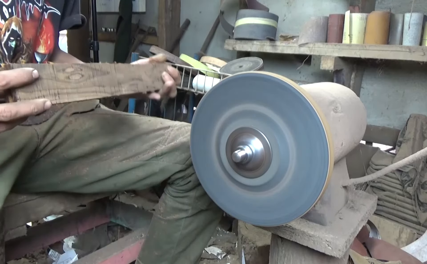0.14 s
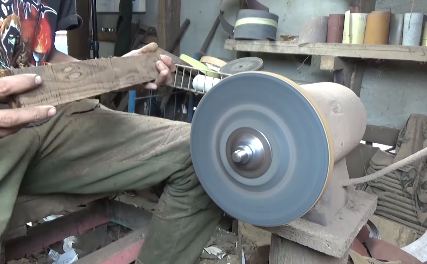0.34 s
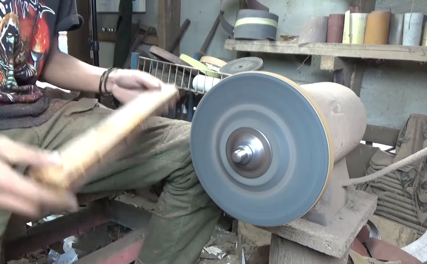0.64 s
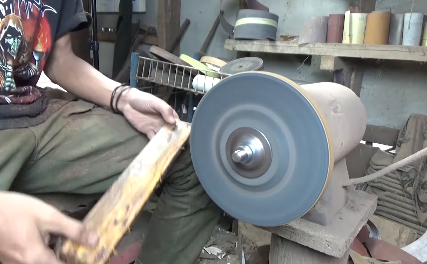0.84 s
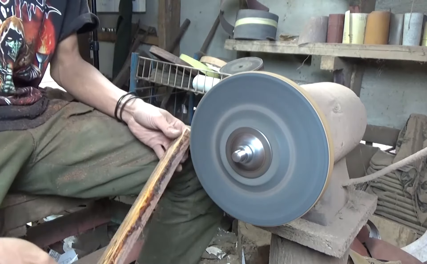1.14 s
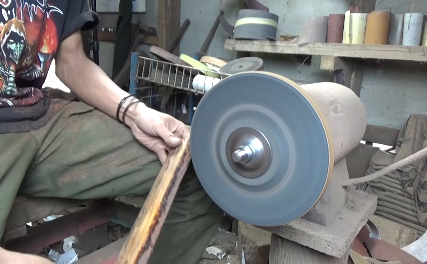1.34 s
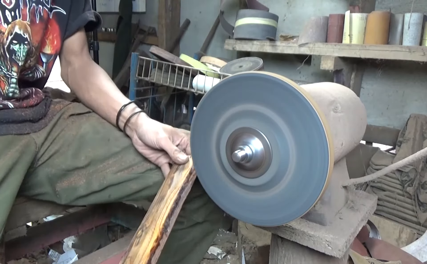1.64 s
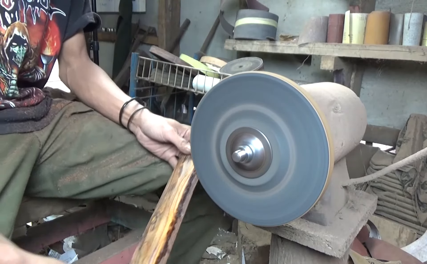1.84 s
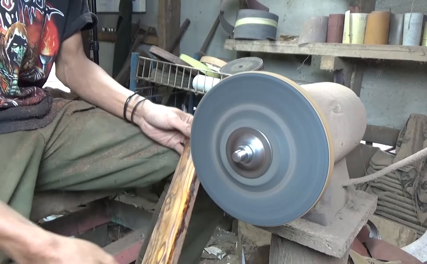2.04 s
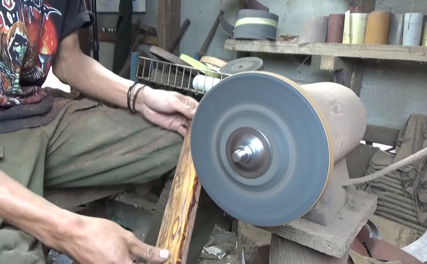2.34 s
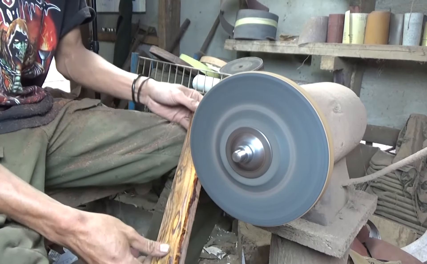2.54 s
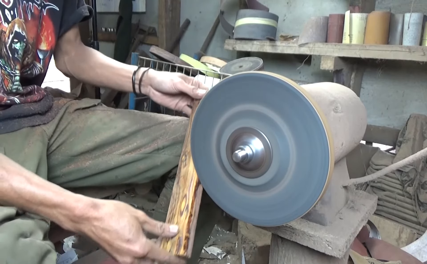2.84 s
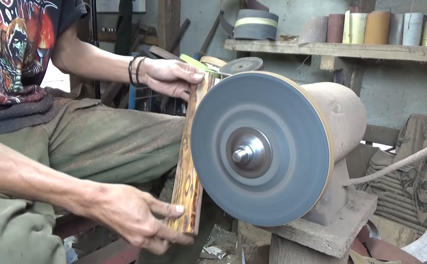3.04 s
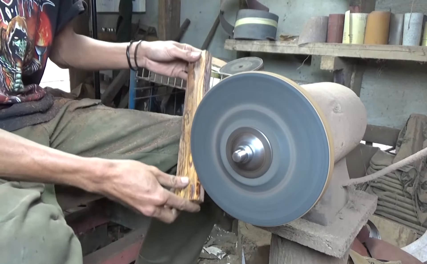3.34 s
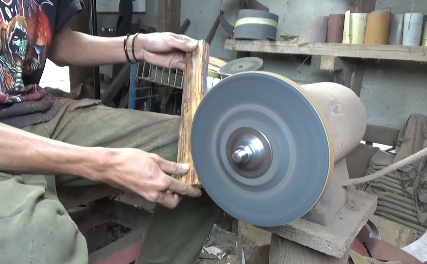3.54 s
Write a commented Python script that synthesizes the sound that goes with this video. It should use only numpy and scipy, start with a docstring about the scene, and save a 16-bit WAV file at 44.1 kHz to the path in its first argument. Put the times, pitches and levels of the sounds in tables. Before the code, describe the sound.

Close in a small workshop, a spinning sander hums and whines alone, then grinds wood in a loud hissing rasp; a short chattering gap separates the first pass from a longer second one.

```python
"""In a workshop an electric disc sander idles, then a board is pressed on its rim in two passes.
The idling machine is a revolving noise with wavering tones; a low drone joins it from the first contact.
The disc wobbles, so light contact comes in one burst per turn; part of the grit pattern returns each turn,
giving a buzzy rasp coloured by the rings of the board. Between the passes the board lifts off and
bounces back against the disc. Sparse echoes of the rasp make the room."""
import sys
import numpy as np
from scipy import signal
from scipy.fft import rfft, irfft
from scipy.io import wavfile
from scipy.ndimage import uniform_filter1d, map_coordinates

SR = 44100
rng = np.random.default_rng(int(sys.argv[2]) if len(sys.argv) > 2 else 0)


def dump(signal):
    """Clip the signal to [-1, 1] and save it as 16-bit WAV at the path in sys.argv[1]."""
    limited = np.clip(np.atleast_2d(signal).T, -1, 1)
    pcm = np.round(limited * 32767).astype(np.int16)
    wavfile.write(sys.argv[1], SR, pcm)


N = 163170
T = np.arange(N) / SR
IDLE_HZ, LOADED_HZ = 49.95, 49.3  # repeats per second of the idling whirr, turns per second under the board

# The two passes of the board. Each row: start in seconds, end in seconds.
PASS_SPANS = [(1.308, 2.15), (2.398, 3.8)]


def amp(db):
    """Level law: a ratio of amplitudes is 10 to the power of dB / 20."""
    return 10 ** (np.asarray(db) / 20)


def evened(x):
    """Normalisation: scale a signal to rms 1."""
    return x / np.sqrt(np.mean(x ** 2) + 1e-20)


def read(points, hz):
    """Interpolation of a spectrum along a logarithmic frequency axis."""
    f, value = np.transpose(points)
    return np.interp(np.log(hz + 1), np.log(f + 1), value)


def curve(rows, column=1):
    """Linear interpolation in time of one column of a table."""
    rows = np.array(rows)
    return np.interp(T, rows[:, 0], rows[:, column])


def wander(rate_hz):
    """Low-passed noise: a random fluctuation of rms 1, mostly slower than the given rate."""
    hz = np.fft.rfftfreq(N, 1 / SR)
    low_pass = (hz > 0) / (1 + (hz / rate_hz) ** 4)
    return evened(irfft(rfft(rng.standard_normal(N)) * low_pass, N))


def colour(x, gain_db):
    """Minimum-phase filtering: the Hilbert transform of the log gain gives the phase of a causal filter."""
    hz = abs(np.fft.fftfreq(16384, 1 / SR))
    log_gain = np.log(amp(np.maximum(gain_db(hz), -110)))
    taps = np.fft.ifft(np.exp(np.conj(signal.hilbert(log_gain)))).real[:4096]
    return signal.oaconvolve(x, taps / np.linalg.norm(taps))[:N]


def revolving(turns, turn_hz, same, drift):
    """Cyclic noise around a disc: part returns every turn, its phase drifting (rad per turn); the rest is new."""
    size, count = 2048, int(turns[-1]) + 2  # points per turn, number of turns
    hz = np.arange(size // 2 + 1) * turn_hz
    share = np.clip(read(same, hz), 0, 1)
    new_real, new_imag, steps = rng.standard_normal((3, count, len(hz)))
    start_phase = 2 * np.pi * rng.random(len(hz))
    kept = np.exp(1j * (np.cumsum(drift * steps, axis=0) + start_phase))
    fresh = new_real + 1j * new_imag
    spectrum = np.sqrt(share) * kept + np.sqrt((1 - share) / 2) * fresh
    spectrum = spectrum * (hz < SR / 2.1)  # stay below the Nyquist limit
    around = irfft(spectrum, axis=1).ravel()
    return evened(map_coordinates(around, [turns * size], order=3))


def workshop(x):
    """Reverberation: sparse echoes of random sign, each band decaying at its own rate."""
    # Each row: frequency in Hz, time to fall by 60 dB in seconds.
    room_t60 = [(200, 0.17), (12000, 0.089)]
    taps = np.zeros(SR // 2)
    at = np.arange(200, len(taps) - 20, 20)
    taps[at + rng.integers(0, 20, len(at))] = rng.choice([-1., 1.], len(at))
    hz, t, z = signal.stft(taps, SR, nperseg=256)
    decay = amp(-60 * t / read(room_t60, hz)[:, None])
    tail = signal.istft(z * decay, SR, nperseg=256)[1]
    return signal.fftconvolve(x, tail / np.linalg.norm(tail))[:N]


def idling():
    """Rotating-machine noise: a partly periodic whirr plus tones with wavering level and phase."""
    # Spectrum of the whirr. Each row: frequency in Hz, relative level in dB per Hz.
    whirr_colour = [(80, -43), (130, -15.5), (250, -11.5), (450, -5.5), (640, -21), (930, -10.5),
                    (1280, -8.5), (1740, -16), (2410, -4), (2800, -15), (3600, -7), (4900, -14),
                    (5400, -25), (8200, -25.5), (9600, -18.5), (12500, -28.5), (14500, -52)]
    # Periodicity of the whirr. Each row: frequency in Hz, share of the power returning each cycle.
    whirr_same = [(300, 0.62), (2500, 0.47), (7000, 0.16)]
    # Each row: time in seconds, rms level of the whirr in dB, swell of the whine in dB.
    whirr_level = [(0, -31, -6), (.45, -30.5, 5), (1.25, -29, 4.5)]
    # Mains hum, motor tones and whine. Each row: frequency in Hz, rms level in dB before swell and waver.
    tones = [(99.9, -50.5), (295.2, -41.5), (442.8, -48), (449.7, -43), (1276, -44), (2257, -44),
             (2401, -43), (2503, -47.5)]

    whirr = revolving(IDLE_HZ * T, IDLE_HZ, whirr_same, 0.25)
    whirr = evened(colour(whirr, lambda hz: read(whirr_colour, hz)))
    out = amp(curve(whirr_level)) * whirr
    for hz, db in tones:
        swell = curve(whirr_level, column=2) if 2100 < hz < 2700 else 0  # only the whine swells
        loose = .15 if hz < 150 else 1  # the mains hum is nearly steady
        waver = loose * 3 * wander(11.5)  # dB
        slip = loose * 0.089 * wander(13.0)  # cycles
        out = out + np.sqrt(2) * amp(db + swell + waver) * np.sin(2 * np.pi * (hz * T + rng.random() + slip))
    return out


def drone():
    """Forced vibration: the bench hums at the fifth harmonic of the turn rate, its phase wavering a little."""
    # Each row: time in seconds, rms level in dB.
    drone_level = [(1.48, -41), (1.93, -56), (2.0, -34), (2.2, -46), (2.42, -50), (2.5, -27), (2.62, -36),
                   (3.36, -40.5), (3.48, -32.5), (3.7, -34)]
    cycles = 5 * LOADED_HZ * T  # the waver below is in radians / 2 pi, that is cycles
    level = amp(curve(drone_level)) * (T > PASS_SPANS[0][0])
    return np.sqrt(2) * level * np.sin(2 * np.pi * (cycles + .05 * wander(8.)))


def bounces():
    """Impact envelopes: linear rise and exponential decay of each bounce, for bass, ring, middle and hiss."""
    # Each row: start in seconds, hiss level in dB before rise and decay, middle above the hiss in dB,
    # decay time in seconds.
    bounce_rows = [(2.2275, -4, -5.5, 0.0057), (2.238, -18.5, 1.5, 0.0068), (2.261, 0.5, -6.5, 0.0031),
                   (2.29, -19, 5, 0.0045), (2.302, -6, -1, 0.0029), (2.343, -3.5, -0.5, 0.0027),
                   (2.369, -19, 4, 0.0078), (2.383, -6.5, 3, 0.0054)]
    rise_s, ring_db, bass_db = 0.0027, -3.5, -17.5  # ring over the middle, bass over the hiss
    out = np.zeros((4, N))
    for start, db, middle_db, length in bounce_rows:
        since = np.maximum(T - start, 0)
        shape = np.minimum(since / rise_s, 1) * np.exp(-since / max(length, .001))
        band_db = np.array([[bass_db], [middle_db + ring_db], [middle_db], [0]])
        out += amp(db + band_db) * shape
    return out


def patchy(x, depth_db):
    """Time-frequency modulation: the colour drifts in patches about 600 Hz wide and .1 s long."""
    z = signal.stft(x, nperseg=256, noverlap=128)[2]
    field = rng.standard_normal(z.shape)
    for _ in range(2):
        field = uniform_filter1d(field, size=3, axis=0)
        field = uniform_filter1d(field, size=24, axis=1)
    modulated = z * amp(depth_db * evened(field))
    return evened(signal.istft(modulated, nperseg=256, noverlap=128)[1][:N])


def knocks(turns):
    """Periodic impact: the high spot of the disc strikes once a turn, a little harder or softer each time."""
    struck = np.diff(np.floor(turns), prepend=np.floor(turns[0])) > 0
    return evened(struck * amp(3.5 * wander(20)))  # unevenness of 3.5 dB


def board(hz, band, grip):
    """Modal resonance: the rasp's colour (dB) raised by the board's rings, in one band and one grip."""
    # Spectrum of the rasp. Each row: frequency in Hz, relative level in dB per Hz.
    rasp_colour = [(59, -66.5), (100, -27), (230, -14.5), (634, -16.5), (1000, -8.5), (1340, -15.5),
                   (2130, -6.5), (4980, -10.5), (9610, 0), (12900, -2.5), (16000, -25)]
    # Edges of bass, ring, middle and hiss, in Hz.
    band_edges = (0, 650, 1500, 5000, SR)
    # Rings common to all grips. Each row: frequency in Hz, width in Hz, height over the rasp in dB.
    low_rings = [(258, 15, 15), (418, 25, 10)]
    # Rings that trade strength. Each row: frequency in Hz, width in Hz, then height in dB in each of four grips.
    board_rings = [(817, 110, -3, -11, 6, 8.5), (1117, 156, 8, 15, 10, 12), (1600, 35, -12, -2, 9, 8.5),
                   (1754, 24, -7, 10.5, 9, 12.5), (2086, 128, 0.5, 8, 8, 1), (2804, 110, 4, 8, -10, 3),
                   (3678, 96, -3, -3, 3.5, 7.5), (5720, 190, 14, -1, -15, 2), (7400, 670, 5.5, 7.5, 4, -4),
                   (9370, 900, -8, -7, 3.5, 1)]

    modes = low_rings + [(row[0], row[1], row[2 + grip]) for row in board_rings]
    rings = sum(amp(db) ** 2 / (1 + (2 * (hz - f) / width) ** 2) for f, width, db in modes)
    lo, hi = band_edges[band:band + 2]
    edges = (1 + (lo / (hz + 1)) ** 12) * (1 + (hz / hi) ** 12)
    return read(rasp_colour, hz) + 10 * np.log10((1 + rings) / edges)


def contact(turns, pressure):
    """Intermittent contact: pressure plus the disc's wobble, cut off below zero and smoothed in time."""
    let_go_s = 0.0015
    keep = np.exp(-1 / (let_go_s * SR))
    wobble = np.cos(2 * np.pi * (turns + 0.037))
    force = np.maximum(np.maximum(pressure, -.95) + wobble, 0)
    touch = signal.lfilter([1 - keep], [1, -keep], force)
    power = uniform_filter1d(touch ** 2, size=round(2 * SR / LOADED_HZ))  # over two turns
    return touch / np.sqrt(power + 1e-9)


def sanding():
    """Source and filter: grit noise, gated by contact and by bounces, drives the resonant board in four bands."""
    # One table for each pass. Each row: time in seconds, level of the hiss in dB, then above the hiss
    # in dB: middle, board ring, bass.
    passes = [
        [(1.31, -16, -8.5, -17, -29), (1.42, -19.5, 2, -17, -28), (1.47, -15.5, -2, -11.5, -27),
         (1.6, -12.5, -12.5, -13.5, -27.5), (1.8, -16.5, -3.5, -7, -17), (1.94, -15, -7, -2.5, -25),
         (2.0, -20, -3.5, -5.5, -6), (2.07, -14, -11, -9.5, -16.5), (2.15, -18.5, -5, -6, -20.5)],
        [(2.4, -20.5, -1, -5, -13), (2.5, -17, -1.5, -3, -3.5), (2.58, -16, -1.5, -5, -13),
         (3.5, -16.5, -1, -10.5, -14), (3.69, -19.5, 2.5, -9, -14)],
    ]
    # Hold on the board. Each row: time in seconds, place around the rim in turns, pressure in heights
    # of the wobble (under 1 contact breaks once a turn).
    hold = [(1.3, 0.18, -0.8), (1.42, 0.23, -0.16), (1.53, .41, 1), (1.9, 0.47, 2), (2.02, 0.22, .3),
            (2.14, 0.35, -0.2), (2.4, .39, -0.95), (2.51, 0.48, -0.46), (2.59, 0.7, 2.5), (3.7, 0.66, 2.5)]
    # Repetition of the grit. Each row: frequency in Hz, share of the power returning each turn.
    grit_same = [(1500, 0.89), (4000, 0.4), (7000, 0.26)]
    # The hands move along the board, so its rings trade strength: moments of four grips, in seconds.
    grips = (1.44, 1.6, 2.75, 3.4)
    patch_db, grain_db, flicker_db = 1.35, 1.5, 1.0  # rms depths
    knock_ring_db, knock_middle_db = 0.5, -8.5  # knocks over the grit

    turns = LOADED_HZ * T + uniform_filter1d(curve(hold), size=1500)
    touch = contact(turns, curve(hold, column=2))
    drive = bounces()
    for rows, (start, end) in zip(passes, PASS_SPANS):
        pressed = touch * (T > start) * (T < end) * amp(curve(rows))
        band_gains = [amp(curve(rows, column=c)) for c in (4, 3, 2)] + [np.ones(N)]
        drive = drive + pressed * np.array(band_gains)

    even = revolving(turns, LOADED_HZ, grit_same, drift=.3)
    grain = amp(grain_db * wander(470.0) + flicker_db * wander(15.5))
    rough = evened(patchy(even, patch_db) * grain)
    knock = knocks(turns + 0.12194)
    # knocks ring the board; patches and grain show in the upper bands
    ring = evened(even + amp(knock_ring_db) * knock)
    middle = evened(rough + amp(knock_middle_db) * knock)
    grit = (even, ring, middle, rough)

    held = [np.interp(T, grips, row) for row in np.eye(len(grips))]  # each grip fades into the next
    out = np.zeros(N)
    for band in range(4):
        for grip in range(len(grips)):
            force = grit[band] * drive[band] * held[grip]
            out += colour(force, lambda hz: board(hz, band, grip))
    return out


def scene():
    """Superposition: the rasp and its echoes over the drone and the idling machine."""
    rasp = sanding()
    echoes = amp(-8.5) * workshop(rasp)
    return (rasp + echoes + drone() + idling())[None]


def record(dry):
    """Saturation and band limits: peaks clip, the microphone cuts the bass, a low-pass cuts the top."""
    clip_level, low_cut_hz, edge_hz = .93, 20, 15900
    high_pass = signal.butter(2, low_cut_hz, "high", fs=SR, output="sos")
    clipped = signal.sosfilt(high_pass, np.clip(dry, -clip_level, clip_level))
    low_pass = signal.firwin(511, edge_hz, window=("kaiser", 9), fs=SR)
    return signal.oaconvolve(clipped, low_pass[None], "same")


dry = scene()
out = record(dry)
dump(out)
```